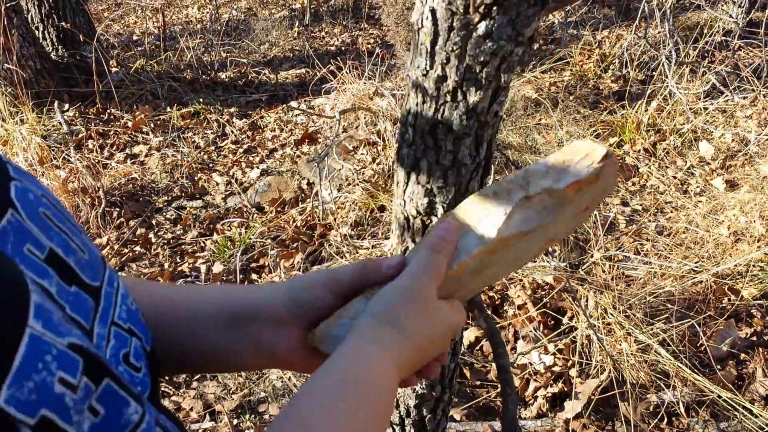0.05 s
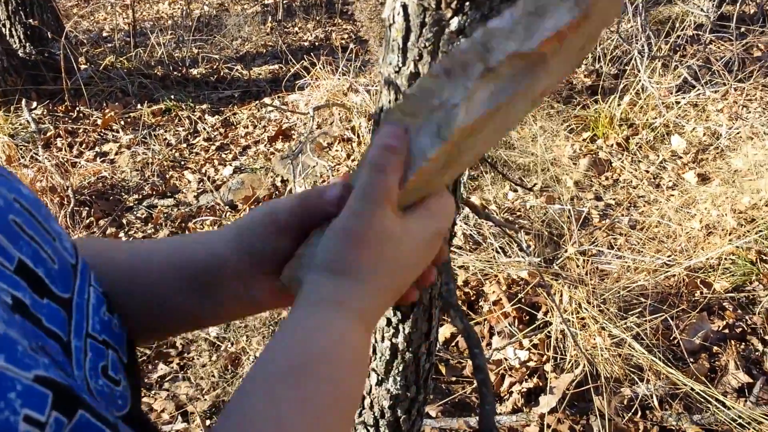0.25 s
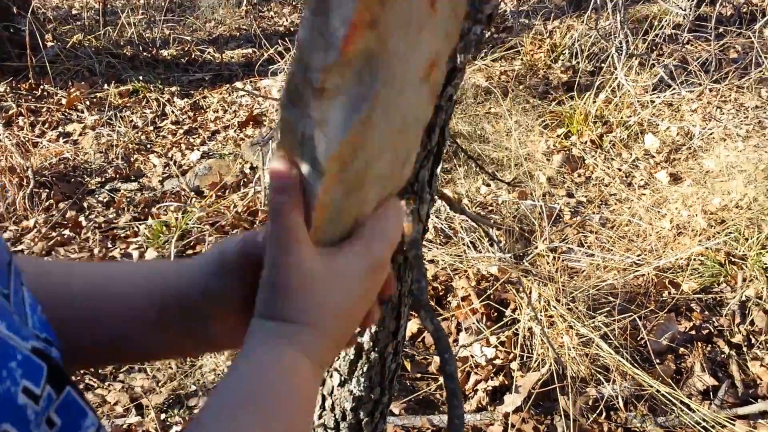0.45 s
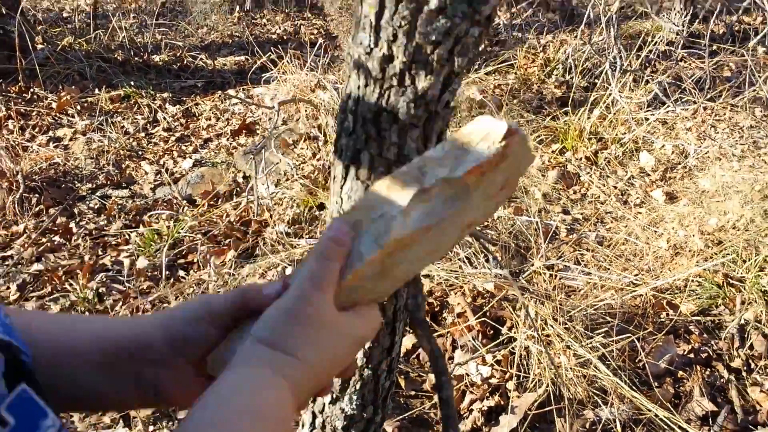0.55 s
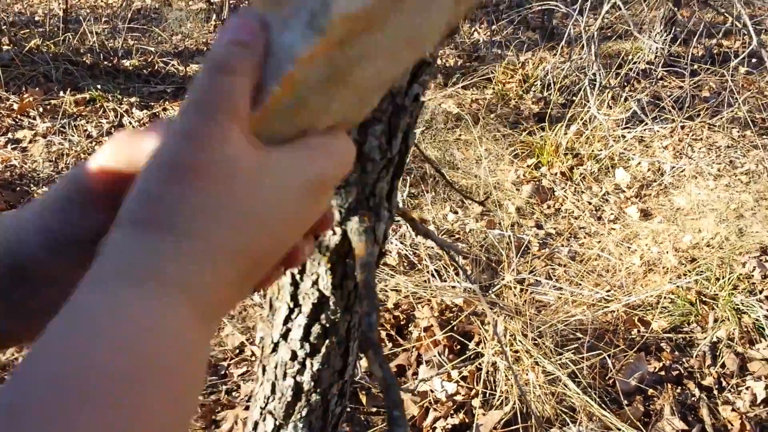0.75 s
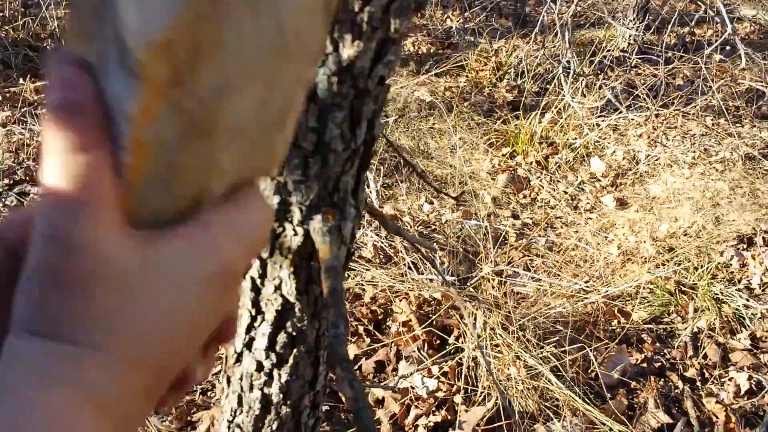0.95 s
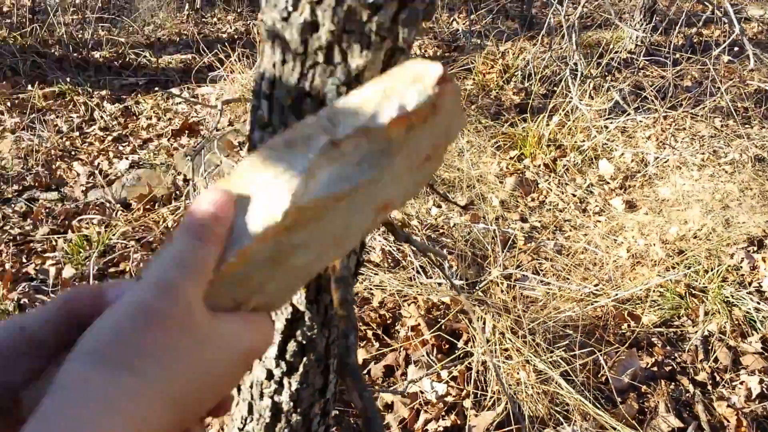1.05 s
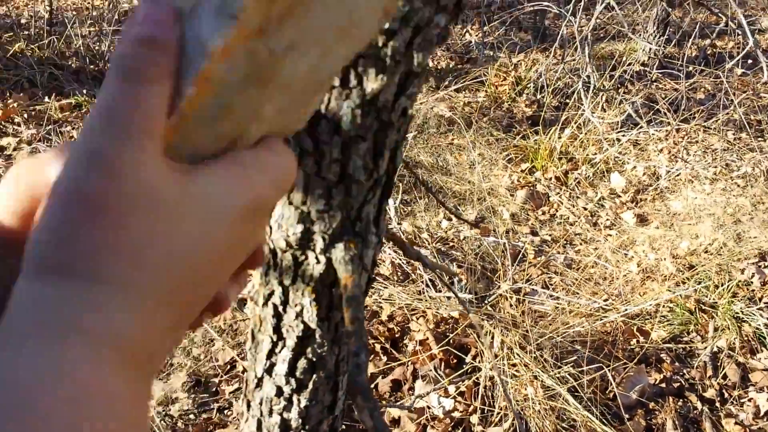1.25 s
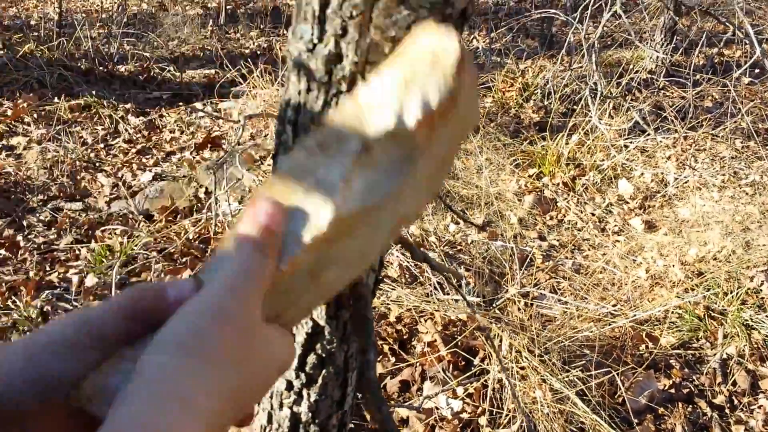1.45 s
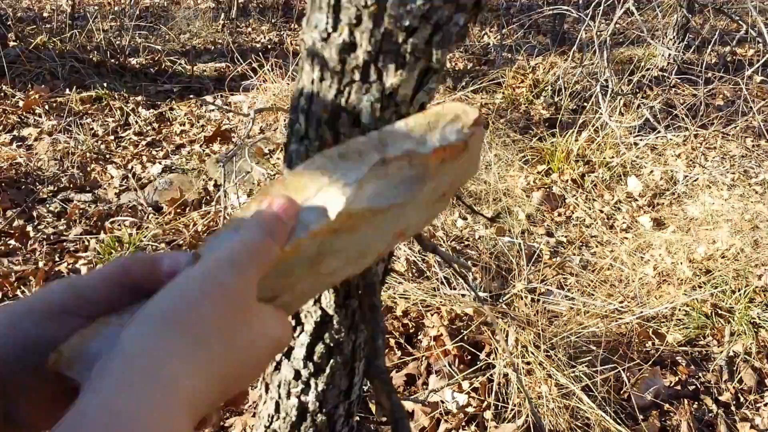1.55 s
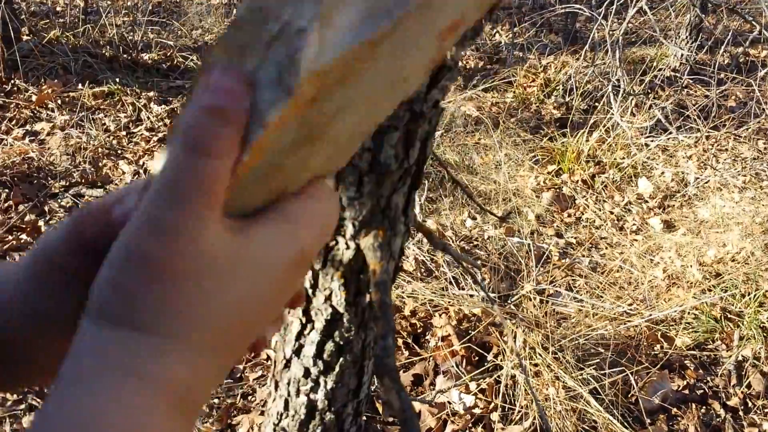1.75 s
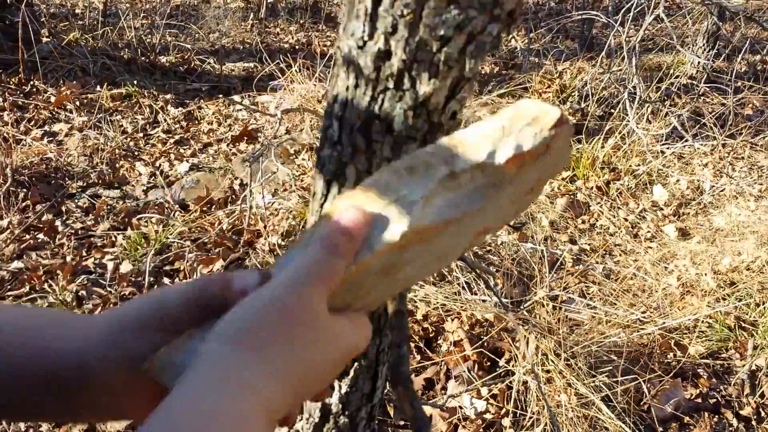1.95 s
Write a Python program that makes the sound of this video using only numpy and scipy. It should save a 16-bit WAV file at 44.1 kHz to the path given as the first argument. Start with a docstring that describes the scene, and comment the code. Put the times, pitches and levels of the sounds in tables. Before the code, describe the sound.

Four woody chops of a stone blade on a branch, with bark cracking and leaves rustling.

```python
"""A stone blade chops at a twig on a thin trunk in dry woodland, close to a small stereo camera.
Each blow knocks the wood, sets the trunk ringing low, cracks bark and snaps fibres.
Flying chips tick on the camera shell near the left microphone. Crumbs and dry leaves
rustle over a far hush and a light wind that buffets the microphone ports."""
import sys
import numpy as np
from scipy import signal
from scipy.fft import rfft, irfft
from scipy.io import wavfile
from scipy.ndimage import uniform_filter1d

SR = 44100
rng = np.random.default_rng(int(sys.argv[2]) if len(sys.argv) > 2 else 0)


def generate_wav(signal):
    """Clip the signal to [-1, 1] and save it as 16-bit WAV at the path in sys.argv[1]."""
    frames = np.transpose(np.atleast_2d(signal))
    scaled = np.clip(frames, -1, 1) * 32767
    pcm = np.round(scaled).astype(np.int16)
    wavfile.write(sys.argv[1], SR, pcm)


N = 88200


def amp(db):
    return 10 ** (np.asarray(db) / 20)


def unit_rms(x):
    return x / np.sqrt(np.mean(x ** 2) + 1e-20)


def fader(points):
    """Gain over the whole scene, riding through (seconds, dB) points."""
    return amp(np.interp(np.arange(N) / SR, *np.transpose(points)))


def equalise(x, points):
    """Minimum-phase EQ through (Hz, dB) points."""
    hz, db = np.transpose(points)
    bin_hz = abs(np.fft.fftfreq(8192, 1 / SR))
    log_gain = np.interp(np.log(bin_hz + 1), np.log(hz), db) * np.log(10) / 20
    taps = np.fft.ifft(np.exp(np.conj(signal.hilbert(log_gain)))).real[:4096]
    return signal.oaconvolve(x, taps[None], axes=1)[:, :x.shape[1]]


def lowpass(x, hz):
    return signal.oaconvolve(x, signal.firwin(511, hz, window=("kaiser", 12), fs=SR)[None], "same")


def place(mix, start_s, sound, pan_db):
    """Mixes a sound in; pan is the level of the left side over the right."""
    at = round(start_s * SR)
    part = mix[:, at:at + sound.shape[-1]]
    part += (sound * amp([[pan_db / 2], [-pan_db / 2]]))[:, :part.shape[1]]


def delay_left(x, lag_s):
    """Delays the left channel against the right; a negative lag makes it lead."""
    turn = np.exp(-1j * np.pi * lag_s * np.fft.rfftfreq(N, 1 / SR))
    return irfft(rfft(x) * np.array([turn, 1 / turn]), N)


def stereo_noise(size, correlation):
    left, other = rng.standard_normal((2, size))
    return np.array([left, correlation * left + np.sqrt(1 - correlation ** 2) * other])


def wobble(smooth_s):
    """Smooth random movement at unit RMS."""
    width = round(smooth_s * SR)
    return unit_rms(uniform_filter1d(uniform_filter1d(rng.standard_normal(N), width), width))


def strike(modes, contact_s, tilt_db, floor_hz, pitch=1, rebound_s=0, rebound=0):
    """Modes struck by a half-sine push and its rebound; little radiates below floor_hz; peak 1."""
    t = np.arange(SR // 4) / SR
    ring = 0
    for hz, db, t60 in modes:
        level_db = db + tilt_db * np.log2(hz / modes[0][0])
        ring = ring + amp(level_db - 60 * t / t60) * np.sin(2 * np.pi * hz * pitch * t)
    push, bounce = (np.sin(np.pi * np.clip((t[:400] - s) / contact_s, 0, 1)) for s in (0, rebound_s))
    hit = np.convolve(ring, push + rebound * bounce)[:len(t)]
    hit = signal.sosfilt(signal.butter(2, floor_hz, "high", fs=SR, output="sos"), hit)
    return hit / abs(hit).max()


# Fader ride of the far hush. Each row: time in seconds, relative level in dB.
HUSH_RIDE = [(0, -50), (.2, -53.5), (.33, -56), (.5, -58), (.7, -53.5), (.96, -53.5), (.995, -67.5),
             (1.17, -60), (1.34, -72.5), (1.53, -68.5), (1.66, -66), (2, -69.5)]
# Its dark tone. Each row: frequency in Hz, gain in dB.
HUSH_EQ = [(60, 3), (150, 2), (300, 0), (700, -9), (1500, -17), (3000, -24.5), (7000, -28.5),
           (15000, -30.5)]


def far_hush():
    """The distant woodland: a dark bed of noise that slowly breathes."""
    level = fader(HUSH_RIDE) * amp(5 + 2.0 * wobble(0.097))
    return level * unit_rms(equalise(stereo_noise(N, correlation=0.59), HUSH_EQ))


# Fader ride of the wind. Each row: time in seconds, relative level in dB.
WIND_RIDE = [(0, -59), (.3, -57), (.6, -60.5), (.75, -50), (.97, -72), (1.03, -66.5), (1.2, -63),
             (1.5, -66), (1.65, -55), (2, -71)]
# Its bassy tone. Each row: frequency in Hz, gain in dB.
WIND_EQ = [(20, -17.5), (35, -31.5), (75, 7), (100, -3.5), (160, -9), (300, -31.5)]


def wind():
    """Light wind: a wide, lumpy rumble."""
    level = fader(WIND_RIDE) * amp(3.5 + 2.2 * wobble(0.015))
    return level * unit_rms(equalise(stereo_noise(N, correlation=0.24), WIND_EQ))


# Wind buffeting a microphone port. Each row: centre in seconds, half length in seconds,
# level on the louder side in dB, frequency in Hz, pan in dB.
PORT_PUFFS = [(0.181, 0.041, -48, 91, -2), (0.452, 0.024, -34.5, 58, -17), (0.569, 0.064, -36.5, 60.6, -24),
              (.68, 0.011, -25.5, 90, -6.5), (0.89, 0.044, -41, 68.4, -6), (1.385, 0.0062, -32, 76, -31.5),
              (1.404, 0.004, -30, 144, -41), (1.416, 0.012, -33.5, 60, -30), (1.808, 0.022, -43, 80, -21),
              (1.99, 0.011, -45.5, 100.7, -18)]


def wind_puffs():
    """Single puffs push the air in a port back and forth, each a soft low bump."""
    out = np.zeros((2, N))
    for centre_s, half_s, db, hz, pan_db in PORT_PUFFS:
        t = np.arange(-2 * half_s, min(2 * half_s, N / SR - centre_s), 1 / SR)
        swell = amp(db - abs(pan_db) / 2) * np.exp(-2 * (t / half_s) ** 2)
        place(out, centre_s + t[0], swell * np.sin(2 * np.pi * (hz * t + rng.random())), pan_db)
    return out


# Fader ride of the crumbs and leaves. Each row: time in seconds, relative level in dB.
RUSTLE_RIDE = [(0, -48), (.15, -46), (.25, -44.5), (.33, -49.5), (.45, -52), (.57, -61), (.68, -39),
               (.8, -45), (.96, -46), (.995, -68), (1.1, -52.5), (1.16, -46), (1.25, -53.5), (1.33, -49.5),
               (1.42, -57), (1.54, -69), (1.6, -48), (1.68, -50), (1.8, -70), (2, -59)]
# Their thin, dry tone. Each row: frequency in Hz, gain in dB.
RUSTLE_EQ = [(300, -59), (1000, 9), (2500, 10.5), (6000, -8), (10000, 10.5), (15000, 4.5)]


def leaf_rustle(clicks_per_s=2500):
    """Dense tiny clicks of crumbs and leaves; dull, middle and bright ones clump apart."""
    bands = 0
    for hz, db in [(2500, -5.0), (6000, 11.5), (11000, -4.5)]:
        sizes = amp(1.6 * np.minimum(rng.exponential(1, (2, N)), 5))
        fires = rng.random((2, N)) < clicks_per_s / SR
        clicks = sizes * fires * rng.choice([-1, 1], (2, N))
        clicks = unit_rms(clicks + 0.096 * clicks[::-1])  # a little bleed between the sides
        clumps = clicks * amp(1.7 * wobble(0.0029))
        bands = bands + amp(db) * equalise(clumps, [(hz / 3, -15), (hz, 0), (hz * 2, -15)])
    flutter = amp(1.5 * wobble(0.0067))
    return amp(-8.5) * fader(RUSTLE_RIDE) * unit_rms(equalise(bands * flutter, RUSTLE_EQ))


# Chips landing. Each row: start in seconds, level in dB, pan in dB, tilt in dB per octave.
CHIP_HITS = [(0.9857, -19, 17.5, 0), (0.9869, -9, 11.5, 21), (1.005, -5.5, 27, 1.5)]
# Ring of the camera shell. Each row: frequency in Hz, relative level in dB, 60 dB decay in seconds.
SHELL_MODES = [(1080, 5.5, 0.0083), (1470, 0, 0.0062), (2856, 8, 0.0041), (3400, 3, 0.0045),
               (5280, 6, 0.0028), (6150, 5.5, 0.0016), (8400, 3.5, 0.0017), (9760, 4.5, 0.0024),
               (12100, -10, 0.0039)]


def chip_ticks():
    """Flying chips tick on the camera shell, reaching the left microphone first."""
    out = np.zeros((2, N))
    for start_s, db, pan_db, tilt_db in CHIP_HITS:
        tick = strike(SHELL_MODES, contact_s=0.00007, tilt_db=tilt_db, floor_hz=810)
        place(out, start_s, amp(db) * tick, pan_db)
    return delay_left(out, lag_s=-0.00011)


# Bark giving way. Each row: peak time in seconds, attack in seconds, 60 dB decay in seconds,
# level in dB, pan in dB, tilt in dB per octave through the mids.
BARK_CRACKS = [(0.1013, 0.00047, 0.01, -22.5, -11.5, -4), (0.1078, 0.0032, 0.022, -27, 19, -2.5),
               (0.1212, 0.0018, 0.06, -27.5, -1, 3), (0.1226, 0.0029, 0.032, -31, 7, 3),
               (0.1367, 0.001, 0.028, -21.5, 0.5, 4.5), (0.146, 0.0035, 0.13, -40, 0, 1),
               (.205, 0.0028, 0.051, -42, 3, -3), (0.227, 0.0033, 0.074, -39, 3.5, 1),
               (0.349, 0.0019, 0.019, -46.5, 0, -0.5), (0.371, 0.0015, 0.054, -47.5, 3, 0),
               (0.429, 0.0029, .03, -46.5, -0.5, -3.5), (0.588, .003, 0.086, -48, 4.5, 3.5),
               (0.6251, .0005, 0.014, -28.5, -25, -2), (0.629, 0.0036, 0.019, -34, 10, -2),
               (0.6414, 0.0049, 0.03, -29.5, 0, 3.5), (0.6558, 0.00065, 0.025, -29, -6, 12),
               (0.66, 0.0034, 0.2, -40.5, 1.5, -2), (0.711, 0.0015, 0.036, -44.5, 17, -4.5),
               (0.75, 0.008, 0.018, -49, -18, 5), (0.8539, 0.0008, 0.02, -38.5, 5, 6),
               (0.903, 0.0028, 0.052, -44.5, -2, 0.5), (0.952, 0.0026, 0.047, -44, 4, -2),
               (1.086, 0.0016, 0.013, -52, 2.5, -5), (1.1193, 0.00054, 0.014, -28, -9.5, -1.5),
               (1.1195, 0.001095, 0.013, -26.5, 13.5, -3), (1.1255, 0.0017, 0.022, -37, 2, 1),
               (1.146, 0.00059, 0.036, -45, 0, -0.5), (1.286, 0.0017, 0.15, -55.5, 3, 1.5),
               (1.436, 0.0015, 0.099, -53.5, 1.5, -1), (1.5564, 0.0034, 0.023, -34, 18.5, 5.5),
               (1.56, 0.0013, 0.022, -29.5, -15.5, 1.5), (1.564, 0.0023, 0.028, -20.5, 6, 3),
               (1.571, 0.0017, 0.26, -44, 0.5, -1), (1.877, 0.0021, 0.032, -50.5, 5, 4)]


def bark_cracks():
    """Bark cracks in bursts of grainy noise that swell quickly and die away."""
    out, t = np.zeros((2, N)), np.arange(SR // 5) / SR
    for peak_s, rise_s, t60, db, pan_db, tilt_db in BARK_CRACKS:
        grain = amp(0.84 * unit_rms(uniform_filter1d(rng.standard_normal(len(t)), size=16)))
        envelope = np.where(t < rise_s, (t / rise_s) ** 2, amp(-60 * (t - rise_s) / t60))
        burst = stereo_noise(len(t), correlation=0.16) * grain * envelope
        burst *= np.linalg.norm(envelope) / np.linalg.norm(burst, axis=1)[:, None]  # equal energy
        tone = [(300, -13 - 3 * tilt_db), (800, -3 * tilt_db), (6400, 0.0038),
                (11000, tilt_db - 1.5), (16000, tilt_db - 9.0)]
        place(out, peak_s - rise_s, amp(db) * equalise(burst, tone), pan_db)
    return out


# Fibre snaps and crumb ticks. Each row: start in seconds, relative level in dB, pan in dB, pitch ratio.
FIBRE_SNAPS = [(0.1084, -19.5, 16, .9), (0.1351, -9, 8, 1.05), (0.2748, -38, 13, .96), (.512, -45, -7, .99),
               (.5854, -44, .5, 1.02), (0.625, -17, -9.5, .98), (0.654, -7.5, 7, .99),
               (.7472, -33, -8, 1.13), (0.84, -34, 7, .99), (0.9524, -32, -1.5, 1.15),
               (1.12, -17.5, -9.5, .99), (1.283, -45, 1, .97), (1.481, -39, 8.5, .9), (1.487, -44, -5, 1.1),
               (1.558, -35, 9, .99), (1.5661, -20, 1, .99), (1.642, -39, -10, .85), (1.87, -54, -14, .95),
               (1.878, -49, 6, 1.08), (1.95, -53, -8, .97), (1.975, -57, -15, 1.2)]
# Ring of a fibre. Each row: base frequency in Hz, relative level in dB, 60 dB decay in seconds.
FIBRE_MODES = [(3000, -6, 0.0036), (5450, -2, 0.004), (7070, 8, 0.004), (8700, -0.5, 0.0065),
               (11000, 0, .005), (14000, 1.5, 0.0054)]


def fibre_snaps(attack_s=0.00032):
    """Single fibres snap and crumbs tick, each a tiny bright ring with a softened attack."""
    out = np.zeros((2, N))
    fade_in = np.minimum(np.arange(SR // 4) / SR / attack_s, 1)
    for start_s, db, pan_db, pitch in FIBRE_SNAPS:
        snap = strike(FIBRE_MODES, contact_s=0.00006, tilt_db=0, floor_hz=1500, pitch=pitch)
        place(out, start_s, amp(db) * fade_in * snap, pan_db)
    return out


# Knock of the twig. Each row: base frequency in Hz, relative level in dB, 60 dB decay in seconds.
TWIG_MODES = [(555, -5, 0.03), (733, -11.5, 0.053), (790, -7.5, 0.021), (960, -8.5, 0.015),
              (1112, -3.5, 0.023), (1447, -2.5, 0.021), (1752, 9, 0.01), (2070, -2, 0.016),
              (2720, -1.5, 0.012), (2940, -4, .01)]
# Low body of the trunk. Each row: frequency in Hz, relative level in dB, 60 dB decay in seconds.
TRUNK_MODES = [(89, -3.5, 0.17), (129.6, 0.5, 0.094), (174.7, 12, 0.097), (232, 3.5, 0.099),
               (299.4, -27, .04), (396, -5.5, 0.061), (541, -11, 0.035), (670, -3, 0.038)]
# The blade landing. Each row: start in seconds, knock level in dB, contact in seconds, twig tilt in dB
# per octave, twig pitch ratio, rebound delay in seconds, rebound share, trunk level in dB, trunk delay
# in seconds, trunk contact in seconds, trunk tilt in dB per octave, knock pan in dB.
BLADE_BLOWS = [(0.1015, -7.5, 0.00026, 1, 0.97, 0.0007, -0.12, -25, 0.0089, 0.0011, 0.5, 2),
               (0.1083, -23, 0.00091, -17, 1.01, 0.0012, -0.3, -38, 0.0024, 0.0013, 15, 3),
               (0.625, -10, 0.00015, 12.5, 0.9, 0.0028, 0.17, -24.5, 0.0054, 0.0017, 0, 5.5),
               (1.1182, -16.5, 0.00041, 5, 1.01, 0.00191, -0.32, -24, 0.0042, 0.0037, -13, 5),
               (1.5673, -20.5, 0.00061, -6, 1, 0.0013, -0.12, -17.5, 0.004, 0.0015, 2.5, 4)]


def blade_chops():
    """The stone knocks the twig; a moment later a softer push sets the trunk ringing low."""
    out = np.zeros((2, N))
    for (start_s, knock_db, contact_s, tilt_db, pitch, rebound_s, rebound,
         trunk_db, trunk_delay_s, trunk_contact_s, trunk_tilt_db, pan_db) in BLADE_BLOWS:
        knock = strike(TWIG_MODES, contact_s, tilt_db, floor_hz=300,
                       pitch=pitch, rebound_s=rebound_s, rebound=rebound)
        body = strike(TRUNK_MODES, trunk_contact_s, trunk_tilt_db, floor_hz=75)
        place(out, start_s, amp(knock_db) * knock, pan_db)
        place(out, start_s + trunk_delay_s, amp(trunk_db) * body, pan_db=0)
    return out


def scene():
    """The tree up front, reaching the right microphone first, over leaves and air."""
    tree = delay_left(blade_chops() + fibre_snaps() + bark_cracks(), lag_s=0.00007)
    return tree + chip_ticks() + leaf_rustle() + far_hush() + wind() + wind_puffs()


# Tone of the left and right microphone ports. Each row: frequency in Hz, gain in dB.
LEFT_PORT_EQ = [(30, -6), (2500, 1.5), (4000, -1), (5500, 4.5), (7300, 14), (8800, 2), (10000, -8.5),
                (12000, -9), (13900, -5), (14500, -9)]
RIGHT_PORT_EQ = [(30, -4.5), (2500, 0.5), (4000, 1), (5500, 8.5), (7300, 14.5), (8800, 4.5), (10000, -2),
                 (12000, 1), (13900, 2.5), (14500, 5)]


def record(dry):
    """Each microphone adds hiss and a treble peak; loud hits clip; the top end drops in two steps."""
    hissy = dry + amp(-93) * rng.standard_normal(dry.shape)
    ports = np.vstack([equalise(hissy[:1], LEFT_PORT_EQ), equalise(hissy[1:], RIGHT_PORT_EQ)])
    clipped = np.clip(ports, -0.82, 0.82)
    body = lowpass(clipped, hz=14700)
    faint_top = amp(-30.5) * (clipped - body)
    return lowpass(body + faint_top, hz=15900)


dry = scene()
out = record(dry)
generate_wav(out)
```